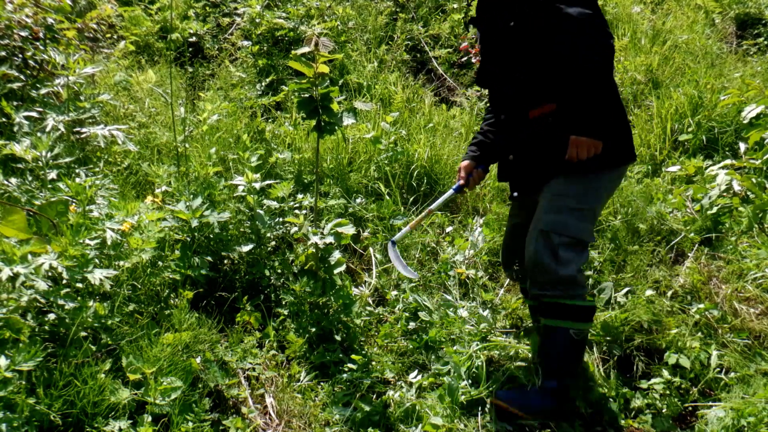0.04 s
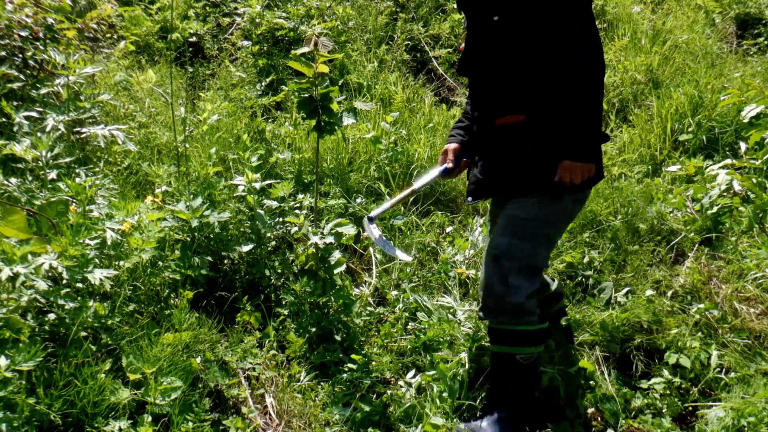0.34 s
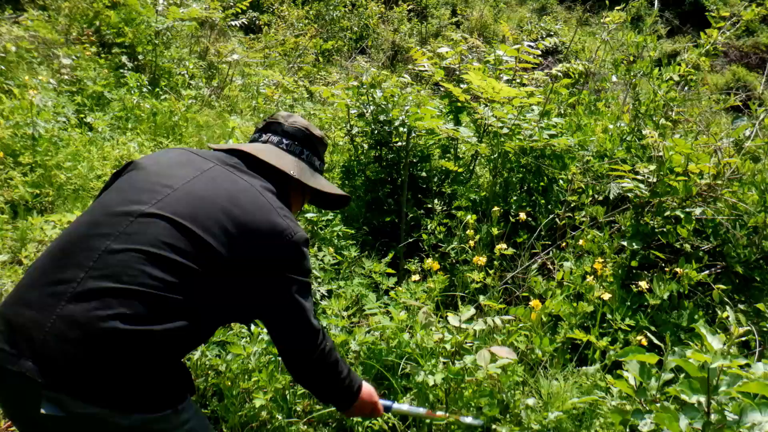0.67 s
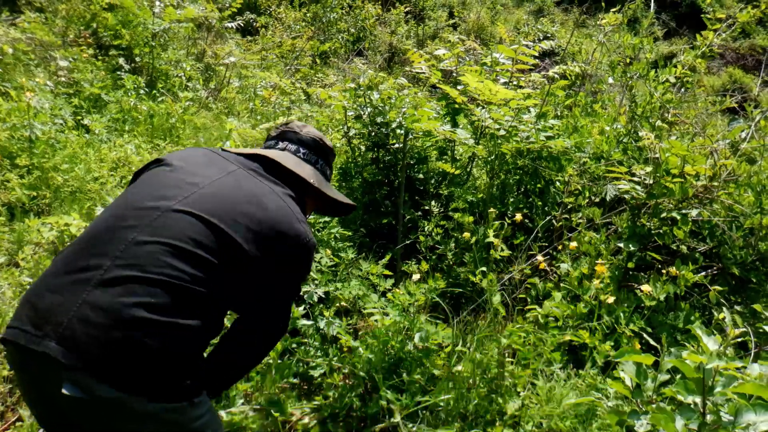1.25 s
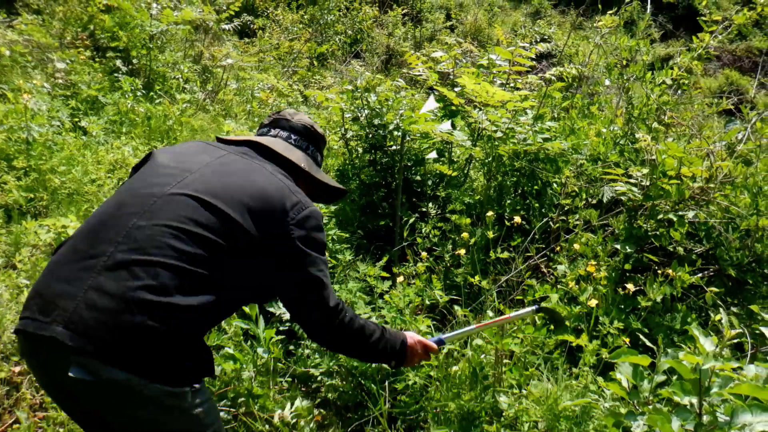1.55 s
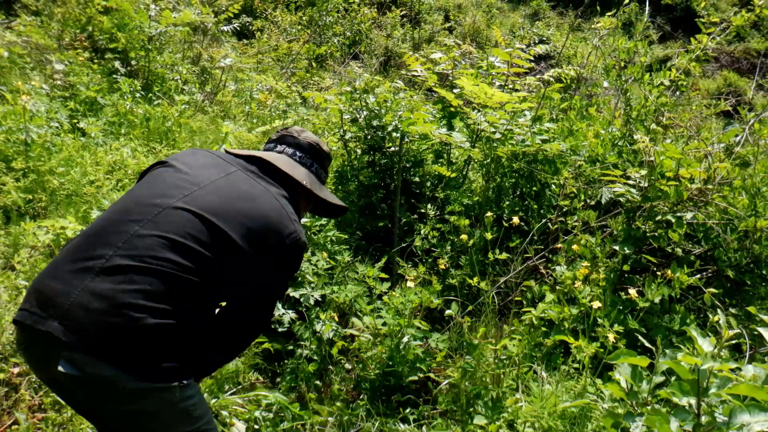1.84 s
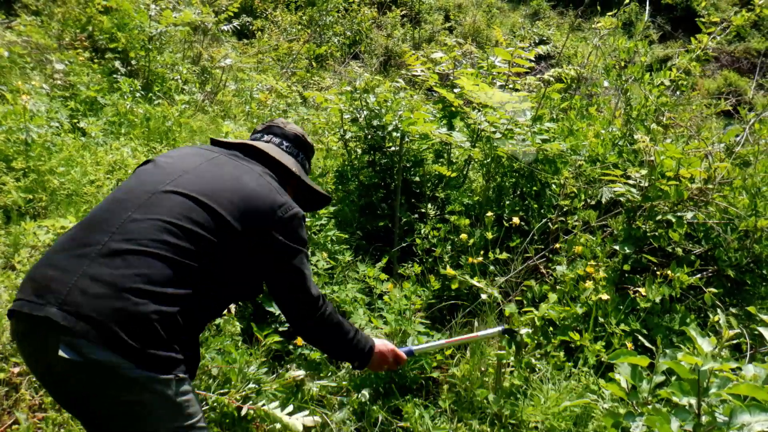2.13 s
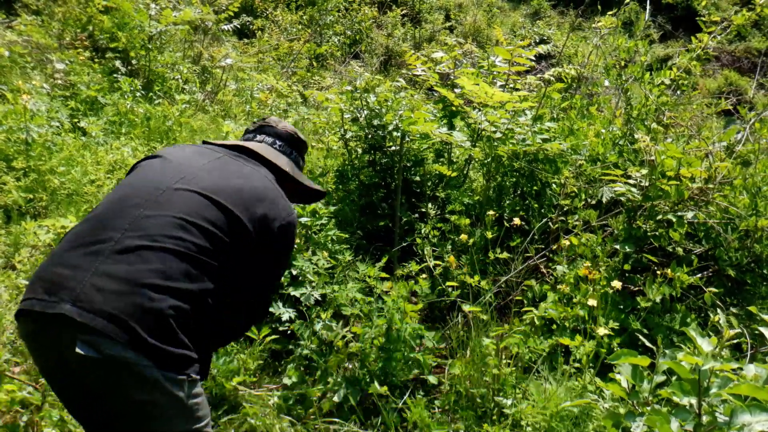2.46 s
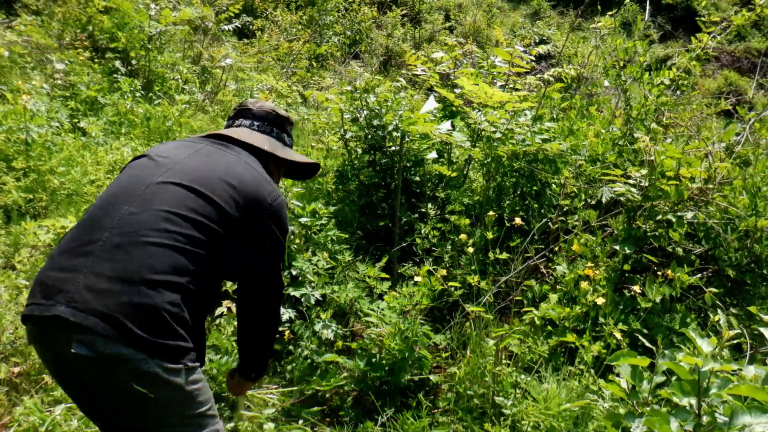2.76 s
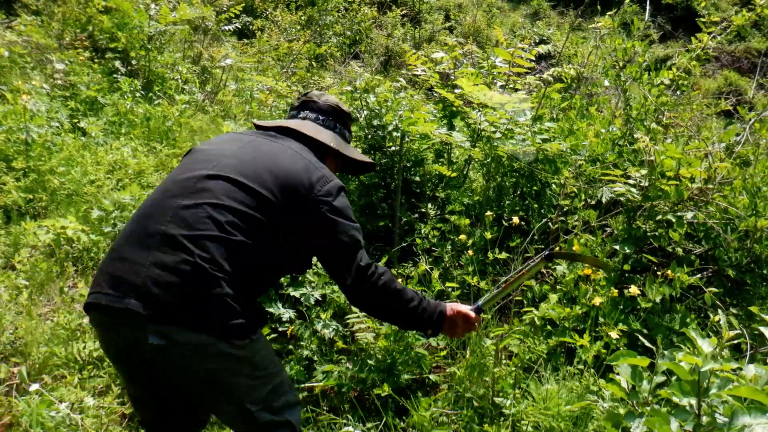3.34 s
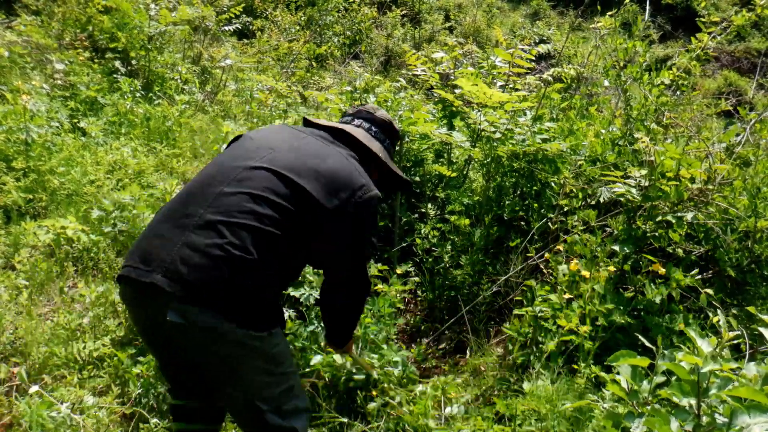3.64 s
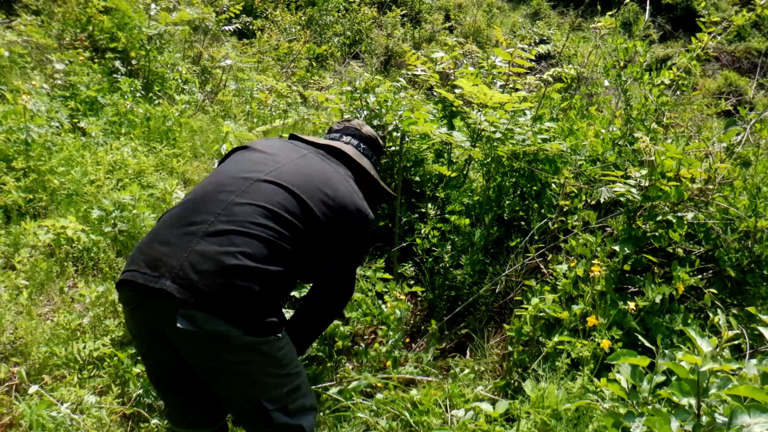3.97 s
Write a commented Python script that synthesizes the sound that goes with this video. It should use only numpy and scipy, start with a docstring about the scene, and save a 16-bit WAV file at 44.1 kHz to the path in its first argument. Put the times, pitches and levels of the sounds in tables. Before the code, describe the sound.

A sickle cuts tall weeds in six evenly paced strokes, each a crisp tearing swish with snapping stalks. Wind briefly buffets the microphone first. Leaves rustle between strokes, and faint, very high crickets tick and trill in the open air.

```python
"""A sickle cuts tall weeds on a sunny slope. From the start, bush crickets tick and trill very high up.
While the worker wades in, wind buffets the microphone; it stops abruptly after about 0.6 s.
Six strokes follow: each brushes into the leaves, tears through a bunch of stems and dies away,
and the second meets something hard with a click. Between strokes the cut weeds are dragged aside,
single stalks snap and boots thud softly on the overgrown ground."""
import sys
import numpy as np
from scipy import signal
from scipy.fft import rfft, irfft, next_fast_len
from scipy.io import wavfile
from scipy.ndimage import map_coordinates

SR = 44100
rng = np.random.default_rng(int(sys.argv[2]) if len(sys.argv) > 2 else 0)


def wrap_up_sound(samples):
    """Save the sound to the file named by the first command line argument, as 16-bit audio."""
    columns = np.atleast_2d(samples).T
    # keep every value between -1 and 1, then stretch to whole-number steps
    tamed = np.clip(columns, -1, 1)
    steps = np.round(tamed * 32767).astype(np.int16)
    wavfile.write(sys.argv[1], SR, steps)


N = 176400

# Spectra of open air, wind rumble and flutter, sliding leaves, breaking stems and their low tearing.
# Each row: frequency in Hz, relative level in dB.
AIR_SPECTRUM = [(25, 0), (50, -4.5), (110, 1), (220, -0.5), (330, -4), (550, -5), (800, -5.5), (1240, -9),
                (2100, -14), (3500, -12.5), (5700, -16.5), (7900, -23.5), (11800, -26.5), (15500, -28)]
RUMBLE_SPECTRUM = [(20, -25), (45, -7.5), (70, 0.5), (105, -1.5), (155, 0.5), (210, -11), (300, -28),
                   (500, -28), (1000, -70)]
FLUTTER_SPECTRUM = [(60, -35), (150, -3), (280, 0.5), (400, -13.5), (600, -23), (1000, -40), (2000, -64)]
LEAF_SPECTRUM = [(120, -20), (200, -9.5), (580, -10), (850, -10), (1600, -8.5), (2200, -8), (3200, -1.5),
                 (3800, 1), (4400, -4), (5500, -4), (6500, -7), (8000, -18), (10000, -30.5), (14000, -36)]
STEM_SPECTRUM = [(590, -36), (1000, -12), (1400, -7), (2100, -5), (2700, -5.5), (3300, 1), (3960, 0.5),
                 (4400, -4), (5600, -2), (7000, -10), (10000, -28), (12500, -37), (15500, -45)]
TEARING_SPECTRUM = [(30, -13), (90, -6.5), (180, 1), (300, -2.5), (500, 0.5), (800, -4.5), (1300, -3.5),
                    (2200, -9.5), (5000, -44)]
# Ticks of one cricket. Each entry: time in seconds.
TICK_TIMES = [.022, .154, .219, .288, .355, .419, .490, .623, .655, .922, .986, 1.050, 1.120, 1.185, 1.255,
              1.388, 1.519, 1.657, 1.788, 1.921, 1.988, 2.057, 2.124, 2.185, 2.255, 2.521, 2.656, 2.791,
              2.915, 2.990, 3.058, 3.124, 3.181, 3.255, 3.390, 3.657, 3.789, 3.923, 3.989]
# Trills of a second cricket. Each row: start in seconds, end in seconds, level in dB.
TRILL_SPANS = [(0, 0.265, -64), (0.723, 1.263, -65.5), (1.724, 2.17, -66.5), (2.728, 3.08, -66.5),
               (3.73, 4.003, -67.5)]
# Eddies at the microphone. Each row: time in seconds, level in dB, width in seconds,
# share of flutter from 0 to 1.
EDDIES = [(.0095, -20.5, 0.0035, 1), (0.022, -18.5, 0.0066, .25), (.076, -29, 0.0055, 0),
          (.097, -24.5, 0.0061, 0.25), (0.127, -33.5, 0.015, 0), (.19, -36, 0.0099, 0.01),
          (0.239, -25.5, 0.0039, 0.14), (0.267, -30.5, 0.0063, 0), (.29, -28.5, 0.007, 0.18),
          (.315, -34, 0.029, 0.16), (0.374, -25.5, 0.0063, 0.28), (0.415, -32, 0.017, 0.1),
          (.45, -30, 0.0085, .08), (.485, -22, 0.013, 0.33), (.511, -19, 0.0078, 0.45),
          (0.534, -25, 0.0098, 0.14), (.568, -35, 0.012, 0), (0.599, -24, 0.0065, 0.11),
          (.625, -26.5, 0.0057, 0.65)]
# The worker's shifts of weight. Each row: time in seconds, level in dB, width in seconds, pitch in Hz.
BOOT_THUDS = [(.95, -53, 0.048, 80), (1.38, -56, 0.024, 230), (1.69, -51, 0.039, 90),
              (2.02, -54.5, 0.047, 90), (2.43, -48.5, 0.055, 189), (2.931, -51, 0.028, 50),
              (3.35, -51.5, 0.038, 34.7)]
# Weeds dragged or brushed. Each row: start, fullest moment and end in seconds, level in dB,
# decay time constant in seconds.
LEAF_SWELLS = [(0.116, 0.232, 0.29, -49, .02), (0.312, 0.352, 0.39, -49, .01),
               (.53, 0.607, 0.71, -56.5, 0.022), (0.864, 0.914, 0.98, -45.5, .015),
               (0.986, 1.022, 1.056, -38.5, 0.03), (1.086, 1.118, 1.193, -43, 0.03),
               (1.356, 1.374, 1.375, -35.5, 0.052), (1.56, 1.66, 1.69, -50.5, 0.017),
               (1.98, 2.115, 2.125, -46, .012), (2.165, 2.178, 2.27, -52, .02),
               (2.398, 2.442, 2.474, -38.5, 0.075), (2.924, 2.992, 3.07, -50, .02),
               (3.072, 3.122, 3.19, -42.5, .02), (3.206, 3.26, 3.317, -35, 0.011),
               (3.352, 3.36, 3.453, -45.5, 0.023), (3.708, 3.823, 3.91, -43, 0.014)]
# Single stalks breaking. Each row: time in seconds, level in dB, pitch in Hz,
# time in seconds for the splintering to fall 60 dB.
STALK_SNAPS = [(.397, -35, 4000, 0.014), (.535, -38.5, 4000, .008), (.633, -30, 4800, 0.0027),
               (.776, -15, 3020, 0.0094), (0.7865, -13, 5400, 0.018), (.8035, -13, 5400, 0.022),
               (0.8413, -20, 4000, .035), (.964, -32, 4000, 0.0088), (1.082, -27, 1700, 0.015),
               (1.277, -20.5, 2200, 0.023), (1.3, -17, 4500, .018), (1.554, -37, 3800, 0.043),
               (1.581, -35.5, 2400, 0.023), (1.833, -14.5, 2980, 0.026), (1.84, -12, 3200, .008),
               (1.8455, -17, 4000, .012), (1.8661, -17, 2000, 0.0091), (2.175, -34, 3000, 0.024),
               (2.329, -16, 4000, .004), (2.336, -12.5, 3050, 0.019), (2.3545, -19, 3800, 0.013),
               (2.628, -37.5, 4500, 0.048), (2.641, -33, 4000, 0.034), (2.659, -26, 3200, 0.023),
               (2.838, -26.5, 5000, 0.025), (2.847, -26, 4000, .02), (2.885, -22.5, 4070, 0.066),
               (2.9065, -25, 4000, .02), (3.202, -26, 4800, 0.029), (3.253, -29, 4000, 0.0045),
               (3.305, -22.5, 4870, 0.014), (3.434, -26.5, 4500, 0.01), (3.455, -31, 3800, .018),
               (3.465, -33.5, 3560, 0.045), (3.501, -14.5, 3760, 0.016), (3.511, -10.5, 3750, 0.042),
               (3.5449, -19.5, 4000, 0.016), (3.703, -34, 5010, 0.0089), (3.972, -34, 2600, 0.013),
               (3.993, -35, 2550, 0.016)]
# Sickle strokes. Each row: first touch, bite and release of the blade in seconds,
# levels of brushing, cutting and low tearing in dB, fade in dB per second.
SICKLE_STROKES = [(0.74, 0.775, 0.81, -42, -26.5, -33, 206), (1.259, 1.29, 1.313, -39, -27, -35.5, 284),
                  (1.804, 1.836, 1.871, -35, -26.5, -33.5, 245),
                  (2.291, 2.332, 2.354, -41, -27, -35.5, 310),
                  (2.833, 2.892, 2.907, -42.5, -35.5, -41.5, 310),
                  (3.498, 3.511, 3.543, -27.5, -30, -38, 179)]
# Narrow gaps in the spectrum. Each entry: frequency in Hz.
NOTCHES = [1780, 3430, 3570, 3640, 4290, 4500]

WIND_END_S = 0.635


def amp(db):
    """Decibels to amplitude ratio."""
    return 10 ** (np.asarray(db) / 20)


def unit(x):
    """Normalisation to rms 1."""
    return x / np.sqrt(np.mean(x ** 2) + 1e-20)


def clock():
    """Time of each sample in seconds."""
    return np.arange(N) / SR


def wobble(rate):
    """Smooth random modulation with rate knots a second."""
    return map_coordinates(rng.standard_normal(8192), [np.arange(N) * rate / SR], mode="wrap")


def shaped(x, gain):
    """Minimum-phase filtering: folding the cepstrum makes the given gain curve causal."""
    m = 2 * next_fast_len(N)
    cepstrum = irfft(np.log(np.maximum(gain(np.fft.rfftfreq(m, 1 / SR)), 1e-6)), m)
    cepstrum[1:m // 2] *= 2
    cepstrum[m // 2 + 1:] = 0
    return irfft(rfft(x, m) * np.exp(rfft(cepstrum)), m)[:N]


def along(points, hz):
    """Gain interpolated between (Hz, dB) points on a logarithmic axis."""
    f, db = np.transpose(points)
    return amp(np.interp(np.log(hz + 1), np.log(f + 1), db))


def noise(gain):
    """Spectrally weighted noise of rms 1."""
    return unit(irfft(rfft(rng.standard_normal(N)) * gain(np.fft.rfftfreq(N, 1 / SR)), N))


def band(centre_hz, width_hz):
    """Narrow-band noise, as from a randomly driven resonance."""
    return noise(lambda hz: 1 / (1 + ((hz - centre_hz) / width_hz) ** 2 / 2))


def steady(x, floor):
    """Envelope compression: dividing by the envelope plus a floor evens out the level."""
    return unit(x / (np.abs(signal.hilbert(x)) + floor))


def bump(s, width):
    """A Gaussian swell centred on s seconds."""
    return np.exp(-.5 * np.minimum(((clock() - s) / width) ** 2, 100))


def crackle(per_s, spread_db, hiss):
    """Shot noise: tiny fibre breaks of random size over a smooth hiss."""
    size = amp(spread_db * np.clip(rng.standard_normal(N), -2, 2)) * rng.choice([-1, 1], N)
    breaks = unit(size * (rng.random(N) < per_s / SR))
    return unit(breaks + hiss * rng.standard_normal(N))


def air():
    """Ambient noise: a broad open-air wash, and a low drone that wavers because its band is narrow."""
    level_db = -53.5 - 1.5 * (clock() < WIND_END_S) + wobble(6.61)
    wash = amp(level_db) * noise(lambda hz: along(AIR_SPECTRUM, hz))
    return wash + amp(-63.5) * band(centre_hz=75.6, width_hz=6.4)


def cricket_ticks():
    """Stridulation in short pulses: a softer, higher lead makes each tick fall in pitch."""
    strengths = amp(rng.normal(0, 1.0, len(TICK_TIMES)))
    ticks = sum(gain * bump(s, 0.0042) for s, gain in zip(TICK_TIMES, strengths))
    leads = sum(gain * bump(s - .0095, 0.0087) for s, gain in zip(TICK_TIMES, strengths))
    tick_tone = steady(band(centre_hz=11950, width_hz=350), floor=.5)
    lead_tone = band(centre_hz=12700, width_hz=270)
    return amp(-61.5) * ticks * tick_tone + amp(-67.5) * leads * lead_tone


def cricket_trills(wingbeat_hz=155, sharpness=3.7, return_db=-5.5):
    """Sustained stridulation: each wingbeat and its weaker return stroke excite a wing resonance."""
    t = clock()
    level = sum(amp(db) * np.clip(np.minimum(t - start, end - t) / 0.0049, 0, 1)
                for start, end, db in TRILL_SPANS)
    beat_hz = wingbeat_hz * (1 + 0.0248 * wobble(20))
    wing = np.cos(2 * np.pi * np.cumsum(beat_hz) / SR)
    rasps = np.exp(sharpness * wing) + amp(return_db) * np.exp(-sharpness * wing)
    resonance = steady(band(centre_hz=11440, width_hz=360), floor=.5)
    return level * unit(rasps * resonance)


def wind(breeze_db=-43.5):
    """Turbulent pressure: eddies hit the microphone as low bumps; the harder ones flutter higher."""
    rumble = steady(noise(lambda hz: along(RUMBLE_SPECTRUM, hz)), floor=0.67)
    rumble = unit(shaped(rumble, lambda hz: 1 / np.sqrt(1 + (hz / 240) ** 8)))
    flutter = noise(lambda hz: along(FLUTTER_SPECTRUM, hz))
    low, high = np.full(N, amp(breeze_db)), np.zeros(N)
    for s, db, width, share in EDDIES:
        swell = amp(db) * bump(s, width)
        low = np.maximum(low, swell * np.sqrt(1 - share ** 2))
        high += swell * share
    blowing = np.clip((WIND_END_S - clock()) / .004, 0, 1)
    return (low * rumble + high * flutter) * blowing


def boots():
    """Cushioned impact: soft growth spreads a boot's force over time, leaving only a low thud."""
    return sum(amp(db) * bump(s, width) * band(hz, width_hz=0.45 * hz) for s, db, width, hz in BOOT_THUDS)


def rustles(stir_db=-59.5, edge_db=6.5, onset_s=0.019):
    """Friction: leaves slide over each other in swells that add in power to a faint stirring."""
    t = clock()
    before_cutting = t < SICKLE_STROKES[0][0]
    power = amp(stir_db - 25 * before_cutting) ** 2
    for start, fullest, end, db, tail in LEAF_SWELLS:
        swell = amp(db - np.interp(t, [start, fullest, end], [edge_db, 0, edge_db]))
        outside = np.maximum(start - t, 0) / onset_s + np.maximum(t - end, 0) / tail
        power += (swell * np.exp(-outside)) ** 2
    fibres = crackle(per_s=2600, spread_db=6, hiss=0.87)
    leaves = unit(shaped(fibres, lambda hz: along(LEAF_SPECTRUM, hz)))
    return np.sqrt(power) * amp(0.6 * wobble(120)) * leaves


def snaps(crack_t60_s=0.00094):
    """Brittle fracture: a stalk releases its strain in one sharp crack and a burst of splinters."""
    out, t = np.zeros(N + SR), np.arange(SR // 10) / SR
    for s, db, pitch_hz, t60 in STALK_SNAPS:
        crack = np.sin(2 * np.pi * pitch_hz * t) * amp(-60 * t / crack_t60_s)
        edges_hz = [.45 * pitch_hz, min(1.67 * pitch_hz, 6600)]
        bandpass = signal.butter(2, edges_hz, "band", fs=SR, output="sos")
        splinters = unit(signal.sosfilt(bandpass, rng.standard_normal(len(t)))) * amp(-60 * t / t60)
        out[round(s * SR):][:len(t)] += amp(db) * (crack + 0.43 * splinters)
    return shaped(out[:N], lambda hz: along([(300, 2.0), (7200, 0.5), (10000, -15), (15000, -14)], hz))


def blade_click(start_s=1.2787, pitch_hz=3120, t60_s=0.0023):
    """Hard impact: the blade meets something stiff, giving an impulse and a heavily damped ring."""
    out, t = np.zeros(N), np.arange(SR // 50) / SR
    ring = np.sin(2 * np.pi * pitch_hz * t) * amp(-60 * t / t60_s)
    out[round(start_s * SR):][:len(t)] = amp(-9) * (ring + 0.65 * (t == 0))
    return out


def cut_envelope(t, bite, release, fade, rise_db=13.5, rise_s=.018):
    """Exponential growth up to the bite, a hold while the blade cuts, then exponential decay."""
    return amp(-rise_db * np.maximum(bite - t, 0) / rise_s - fade * np.maximum(t - release, 0))


def sickle(touch_s=0.0092, tearing_lag_s=0.0026, highpass_hz=1310):
    """Friction, then fracture: the blade brushes the leaves, bites and tears through stems in clumps."""
    t, high, low = clock(), np.zeros(N), np.zeros(N)
    for touch, bite, release, brush_db, cut_db, low_db, fade in SICKLE_STROKES:
        brush = np.clip((t - touch) / touch_s + .5, 0, 1) * (t < bite) * amp(brush_db - cut_db)
        cutting = cut_envelope(t, bite, release, fade)
        tearing = cut_envelope(t - tearing_lag_s, bite, release, 1.16 * fade)
        high += amp(cut_db) * np.maximum(cutting, brush)
        low += amp(low_db) * np.maximum(tearing, brush)
    clumps = amp(1.7 * wobble(170))
    stem_gain = lambda hz: along(STEM_SPECTRUM, hz) / np.sqrt(1 + (highpass_hz / (hz + 1)) ** 4)
    stems = shaped(crackle(per_s=2400, spread_db=2, hiss=0.5), stem_gain)
    tear = shaped(crackle(per_s=1500, spread_db=3.5, hiss=0.68), lambda hz: along(TEARING_SPECTRUM, hz))
    return clumps * (high * unit(stems) + low * unit(tear))


def scene():
    """Superposition: all sources add at one microphone in the open."""
    work = sickle() + rustles() + snaps() + blade_click() + boots()
    return (work + wind() + cricket_ticks() + cricket_trills() + air())[None]


def record(dry, notch_width_hz=22, top_hz=15850):
    """Linear filtering: a few narrow notches thin the spectrum, and the recorder cuts off the treble."""
    notches = lambda hz: np.prod([np.abs(hz - f) / np.hypot(hz - f, notch_width_hz) for f in NOTCHES], 0)
    notched = shaped(dry[0], notches)
    passband = np.fft.rfftfreq(N, 1 / SR) < top_hz
    return irfft(rfft(notched) * passband, N)[None]


dry = scene()
out = record(dry)
wrap_up_sound(out)
```